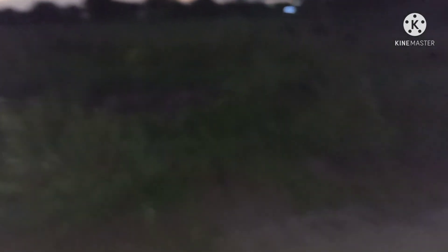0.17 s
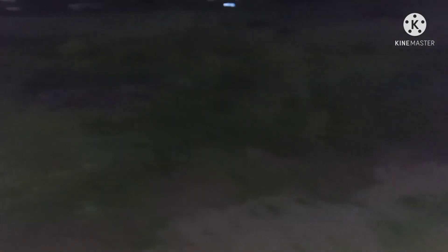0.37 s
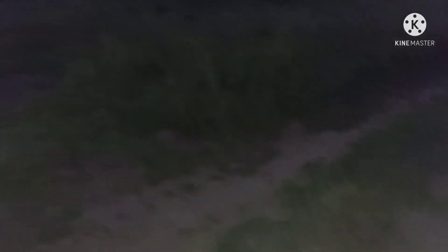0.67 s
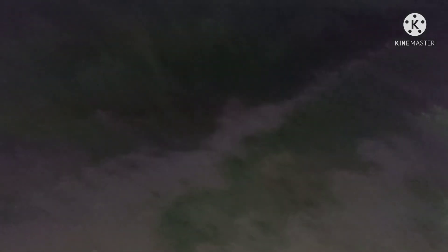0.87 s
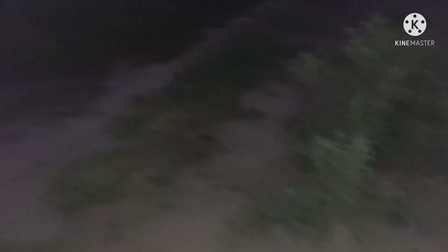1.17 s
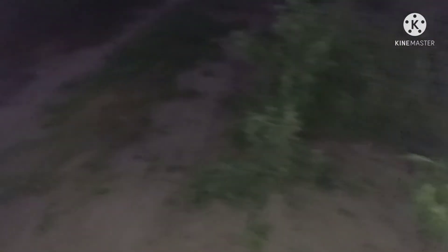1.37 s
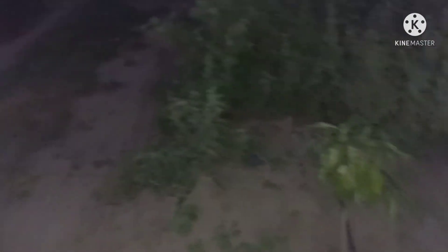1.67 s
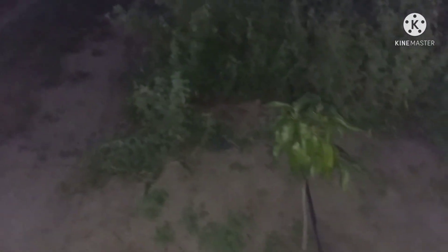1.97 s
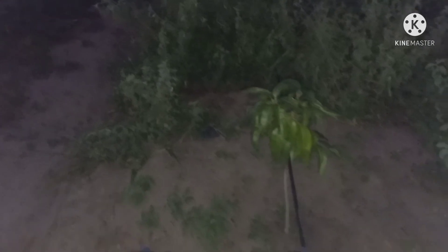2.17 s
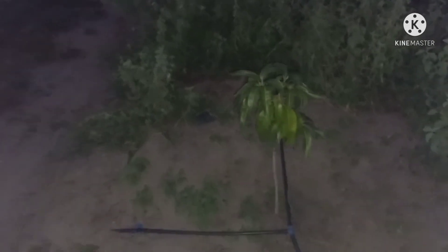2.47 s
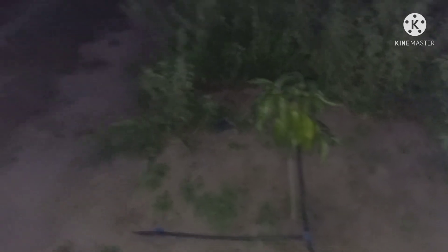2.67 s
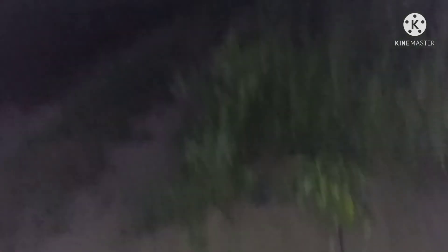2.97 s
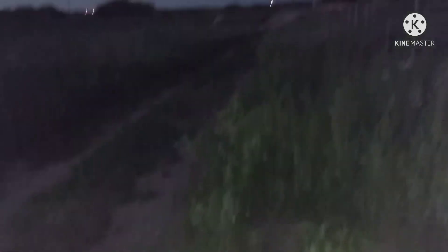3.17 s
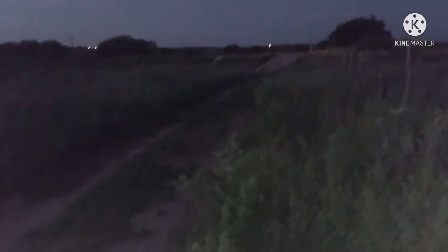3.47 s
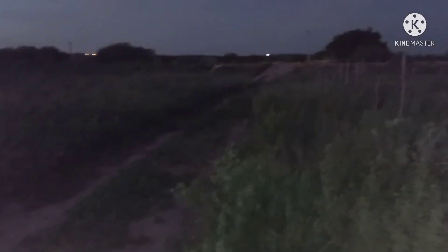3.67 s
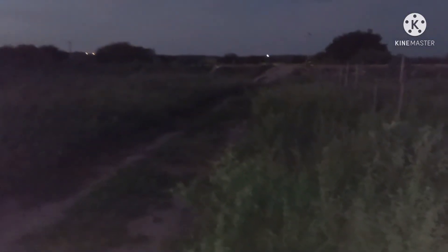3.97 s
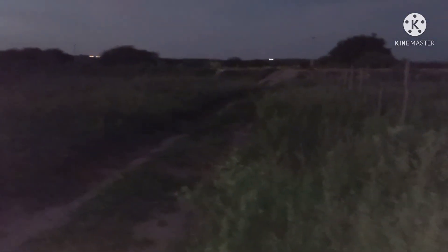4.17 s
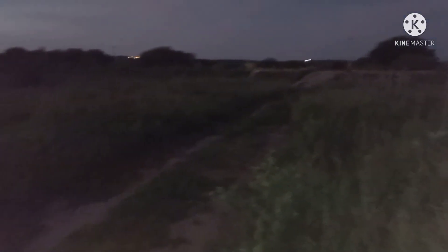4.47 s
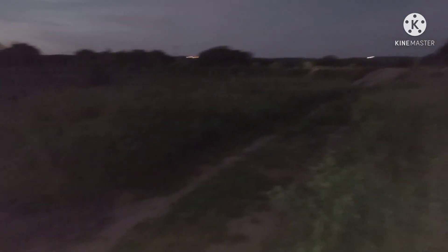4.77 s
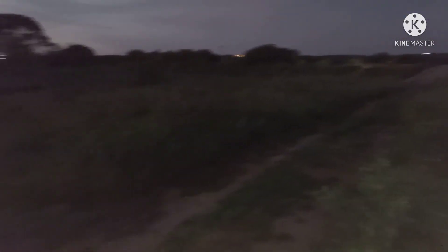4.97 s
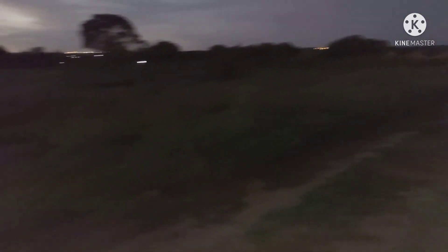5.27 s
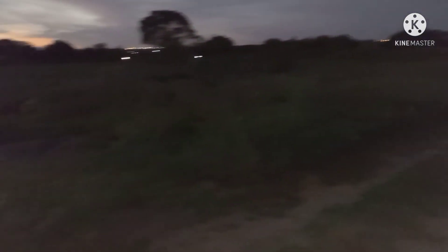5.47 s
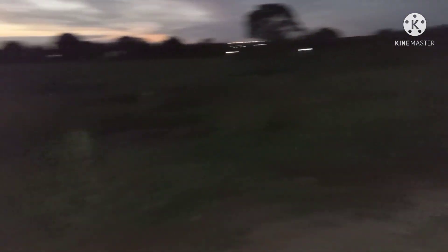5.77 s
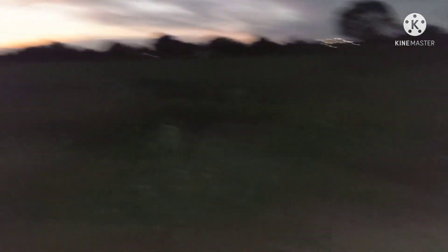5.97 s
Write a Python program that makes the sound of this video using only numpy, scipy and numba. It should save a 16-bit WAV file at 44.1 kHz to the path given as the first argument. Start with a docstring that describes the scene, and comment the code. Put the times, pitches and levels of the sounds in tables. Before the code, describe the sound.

Outdoor phone pickup of a continuous engine idle: a droning low throb, hollow exhaust tone and gritty panel rattle. A plant stem swishes past early and a dull soft knock follows. Insects tick and buzz thinly, a few weak rising chirps come later on the right, and the engine swells past the middle before falling back, over soft airy rumble.

```python
"""Idling engine in the fields

A small engine idles at a nearly steady speed in open fields at dusk, heard by a hand-held phone that turns.
Each firing is a pulse that rings exhaust and silencer; noise and pulses together rattle the casing panels.
One insect buzzes on summed tones and noise, another ticks in bursts of filtered clicks, and chirps rise.
Filtered noise makes leaves, a passing stem, a dull knock and the air; thin whistles are sliding sine tones."""
import sys
import numpy as np
from scipy import signal
from scipy.fft import rfft, irfft
from scipy.io import wavfile
from scipy.ndimage import uniform_filter1d
from numba import njit

SR = 44100
rng = np.random.default_rng(int(sys.argv[2]) if len(sys.argv) > 2 else 0)


def waveform_to_disk(signal):
    """Save audio, clipped to [-1, 1], as 16-bit WAV at the path in sys.argv[1]."""
    frames = np.transpose(np.atleast_2d(signal))
    scaled = np.clip(frames, -1, 1) * 32767
    samples = np.round(scaled).astype(np.int16)
    wavfile.write(sys.argv[1], SR, samples)


N = 269010

# Engine speed: t/s, firing rate f/Hz (a small wobble is added)
FIRING_RATE = [(0, 34.68), (1, 34.72), (1.5, 34.79), (2.4, 34.87), (3.2, 34.96), (4, 35.0), (4.75, 35.04),
               (4.82, 34.66), (6.1, 34.6)]
FIRST_TURN = .405  # part of a cycle already run at the start
# Where the engine stands: t/s, angle to the right of the phone's front/degrees
ENGINE_BEARING = [(0, 80), (.75, 62), (1.25, 38), (1.75, 21), (2.25, 15), (3.25, 12), (4.25, 0), (4.75, 6),
                  (5.25, 15), (6.1, 31)]
MIC_SPACING_M = .15

# Base levels of the exhaust: t/s, boom level/dB, silencer ring level/dB
BOOM_AND_SILENCER = [(0.0, -51, -72), (0.7, -54.5, -71), (0.75, -50, -69), (1.48, -48, -73),
                     (1.63, -49, -68), (2.11, -51.5, -73.5), (2.41, -50, -62), (2.87, -50, -71),
                     (3.09, -48.5, -59.5), (3.26, -51, -58), (3.87, -47, -52.5), (4.66, -45.5, -55),
                     (5.03, -49, -62.5), (5.16, -50, -57), (5.84, -54, -74), (6.1, -53.5, -69)]
# Base levels of the exhaust: t/s, deep thump level/dB, pipe level/dB
THUMP_AND_PIPE_LEVELS = [(0.0, -55, -63), (0.03, -55, -73), (1.1, -51.5, -62), (2.26, -53.5, -65.5),
                         (2.34, -51, -63), (4.47, -52.5, -66.5), (4.77, -55, -57.5), (5.32, -52.5, -66.5),
                         (6.08, -55.5, -74.5), (6.1, -47, -67)]
# Exhaust tone colour: multiple of the firing rate, relative level/dB
EXHAUST_TONE = [(1, -39), (2, -6.5), (3, -13.5), (4, 3.5), (5, 4.5), (6, -11), (7, -24.5), (8, -14.5),
                (9, -14.5), (10, -15), (11, -17), (12, -18), (13, -26), (14, -30), (15, -19), (16, -13),
                (17, -8.5), (18, -7), (19, -21), (20, -16.5), (21, -7.5), (22, -10), (23, -11), (24, -24),
                (25, -19), (26, -40), (28, -31), (29, -15.5), (30, -22.5), (31, -29.5), (32, -13),
                (33, -24.5), (34, -29.5), (35, -16.5), (36, -37.5)]
# Nine exhaust parts: from f/Hz, to f/Hz, suddenness/0-1, gas roughness/ratio, share of the pan/0-1
EXHAUST_PARTS = [(20, 122, .3, .08, .15), (122, 157, .25, .06, .15), (157, 226, .25, .06, .15),
                 (226, 331, .4, .3, .3), (331, 400, .5, .22, .45), (400, 500, .5, .22, .45),
                 (500, 680, .25, .33, .9), (680, 925, .25, .45, .9), (925, 1400, .6, .5, .9)]
# The same parts: level over the base level/dB, gain side-on/dB, gain in the swell/dB
EXHAUST_PART_LEVELS = [(2.5, -3.5, -3.5), (-2, -5.5, 5.5), (2.5, -3, 2.5), (1.5, -10.5, 6), (0, -0.5, -3),
                       (-11, 10, -3.5), (-3.5, 5.5, 1), (-5.5, 2, 3.5), (-6, -5.5, -8)]
# Each pitch of the exhaust pulse has its own delay; around 675 Hz comes last: f/Hz, delay/ms
EXHAUST_DELAY = [(40, 3), (85, -.5), (122, -5), (150, 0), (260, .8), (315, -3), (400, -5), (520, -6.5),
                 (620, -.4), (675, 4.5), (750, -2), (800, -3.5), (950, -1)]
PUFF_DB = 2  # size of each part's own level drift, scaled by its roughness
SWELL_S, SWELL_RISE_S, SWELL_FALL_S = 5.27, 0.52, 0.9  # exhaust parts shift in level around this time
BASS_PAN_DB = -1.44  # left minus right, for every exhaust part
AHEAD_PAN_DB, SIDE_ADDS_PAN_DB = 5.5, -7.5  # left minus right, scaled by each part's share of the pan

# Five panel groups, low to top: width of one filter pass with the engine ahead/Hz,
# share that throbs with the firing/0-1, left-right likeness/0-1, direct knock of the firing/ratio
PANEL_GROUPS = [(340, .3, .75, .22), (400, .25, .6, .3), (300, .15, .55, .22), (330, .25, .55, .25),
                (500, .5, .3, .16)]
# The same groups: left minus right ahead/dB, left minus right side-on/dB
PANEL_PANS = [(5.5, -8.5), (3.5, -10), (-13, -7.5), (-10, -9), (-6.5, -12.5)]
# Resonances of the casing: f/Hz, width/Hz, relative level/dB
PANEL_MODES = [(906, 210, 0), (1140, 260, -2.5), (1480, 226, 1), (1922, 390, -0.5), (2300, 620, -17),
               (2610, 105, -4.5), (3070, 1000, -7)]
# Low panels facing the phone: t/s, centre f/Hz, level/dB
LOW_PANEL_CURVE = [(0.0, 1300, -68), (0.27, 1290, -80), (0.64, 1410, -70.5), (1.19, 1180, -64),
                   (1.93, 1030, -68), (2.14, 940, -78.5), (2.39, 910, -63), (3.36, 940, -66.5),
                   (3.46, 1100, -60.5), (4.66, 1220, -64), (5.93, 1010, -69), (6.1, 1050, -68.5)]
# Middle panels: t/s, centre f/Hz, level/dB
MIDDLE_PANEL_CURVE = [(0.0, 1840, -76), (0.12, 2010, -73.5), (0.3, 1940, -68.5), (0.56, 1850, -66.5),
                      (0.81, 1680, -72), (1.03, 2040, -73), (1.4, 1470, -65), (2.0, 1490, -64.5),
                      (2.6, 1560, -61.5), (2.85, 1730, -76), (3.04, 1710, -63), (3.75, 1470, -66.5),
                      (4.18, 1740, -73.5), (4.79, 1450, -68.5), (5.06, 1570, -66), (5.54, 1390, -71.5),
                      (6.1, 1900, -76.5)]
# High panels: t/s, centre f/Hz, level/dB
HIGH_PANEL_CURVE = [(0.0, 2240, -81), (0.42, 2250, -78), (0.87, 2230, -75), (0.92, 2430, -75),
                    (1.72, 2450, -71.5), (1.852, 2550, -81), (2.24, 2650, -71.5), (2.53, 2460, -71),
                    (2.87, 2400, -83.5), (3.13, 2300, -64.5), (4.38, 2250, -82), (4.47, 2220, -70),
                    (4.76, 2390, -73.5), (5.25, 2300, -66.5), (5.42, 2280, -83.5), (5.8, 2480, -79),
                    (6.1, 2320, -85)]
# Upper panels: t/s, centre f/Hz, level/dB
UPPER_PANEL_CURVE = [(0, 3030, -75), (.19, 2850, -75.5), (.51, 3040, -84), (1.42, 3150, -82),
                     (1.88, 2930, -92), (2.56, 2860, -69.5), (2.72, 2920, -92), (3.14, 3160, -79),
                     (3.45, 2970, -71.5), (3.722, 2820, -71.5), (3.82, 2980, -68.5), (4.08, 2990, -67.5),
                     (4.15, 2920, -76), (4.52, 2990, -69), (4.81, 3060, -86), (5.25, 3270, -73),
                     (5.95, 3000, -93.5), (6.1, 3150, -84)]
# Top panels: t/s, centre f/Hz, level/dB
TOP_PANEL_CURVE = [(0, 5730, -124), (.6, 5660, -80), (.74, 5550, -100), (.8, 4400, -100), (.92, 4540, -75),
                   (1.2, 4240, -94), (1.6, 3970, -75), (1.898, 4020, -92), (2.1, 5450, -88),
                   (2.5, 5450, -79), (2.8, 5530, -81.5), (3.902, 5200, -76.5), (4.4, 5880, -79),
                   (6.1, 5750, -91)]
PAN_DRIFT_DB = 3
SIDE_WIDENS = 1.1  # panels blur together when heard side-on
CASING_LATE = 4  # samples: the casing rattle reaches the left channel this much later
ECHO_MS, ECHO_DRIFT_MS, ECHO_DB = 3.5, .4, -8  # the casing again, off a nearby surface

# Ticking insect, a row for each stroke of the wing file: t/s, length/s, loudest tooth level/dB, ring f/Hz
WING_FILE_STROKES = [(.1486, 0.013, -41.5, 14200), (0.42, 0.007, -50.5, 14300), (0.773, 0.027, -46, 14700),
                     (1.093, 0.01, -51, 15000), (1.7609, 0.016, -52, 14000), (1.817, 0.0061, -43, 13900),
                     (1.914, 0.008, -60, 14700), (2.14, 0.011, -51.5, 13300), (2.3785, 0.016, -58, 14800),
                     (2.578, 0.0062, -38.5, 14700), (2.6434, 0.0091, -50, 15000),
                     (2.716, 0.0037, -50, 13500), (2.967, .02, -44, 14600), (3.0275, 0.0061, -49, 14200),
                     (3.243, 0.04, -44.5, 14100), (3.286, 0.015, -40, 13600), (3.304, 0.01, -49, 13300),
                     (3.6142, 0.016, -57, 14400), (3.8851, 0.0067, -56, 14400),
                     (4.1739, 0.0069, -47, 15100), (4.189, 0.0075, -45, 14600),
                     (4.586, 0.024, -39.5, 14600), (4.998, 0, -44, 14200), (5.1931, 0.008, -54, 14500),
                     (5.417, 0.0033, -55, 15700), (5.485, 0.0028, -50, 15100), (5.7703, 0.004, -55, 14700),
                     (5.8007, 0.0072, -53, 15100), (5.9683, 0.0052, -46, 15100),
                     (6.0382, 0.0098, -46, 15200), (6.0811, 0.0016, -41, 15400)]
TOOTH_S = .01  # time from one tooth to the next
GROW_DB = 3.5  # each tooth louder than the one before
SCRAPE_DB, SCRAPE_S = -78.5, 0.041  # hiss of the wing that swells round each stroke

# Buzzing insect: t/s, base level/dB
BUZZ_LEVEL = [(0.0, -74), (0.03, -76.5), (1.1, -78), (1.26, -70), (2.7, -78.5), (3.41, -71), (5.33, -79),
              (6.1, -79)]
# Buzzing insect: t/s, wing stroke rate f/Hz
WING_RATE = [(0, 165.3), (.35, 165.9), (.65, 168.1), (1.3, 168), (1.55, 167.2), (2.1, 166.6), (2.5, 166.1),
             (2.85, 165.3), (3.3, 164.7), (5, 164.5), (5.5, 168), (6.1, 167.5)]

# Faint rising chirps on the right: t/s, half the peak before panning: level/dB
CHIRP_NOTES = [(2.385, -75), (3.81, -74), (4.01, -72), (4.34, -76), (4.435, -77), (4.68, -79), (5.025, -78),
               (5.215, -74), (5.575, -78)]
CHIRP_S, CHIRP_FROM_HZ, CHIRP_TO_HZ, CHIRP_PAN_DB = .024, 2780, 3100, -6
# Sliding whistles: t/s, length/s, from f/Hz, to f/Hz, base level/dB
WHISTLE_SLIDES = [(2.02, .16, 13050, 11550, -84), (2.18, .13, 11750, 9100, -85),
                  (2.3, .07, 9150, 9400, -85), (4.06, .09, 11600, 13000, -85),
                  (4.14, .08, 12950, 12400, -85), (4.29, .1, 13300, 11400, -91),
                  (4.38, .1, 11400, 11100, -88)]
FADE_S = .02  # whistle fade at each end

# Leaves brushing close: peak t/s, rise/s, fall/s, base level/dB, brightness/dB, fullness/dB
LEAF_RUSTLES = [(0.0, .1, 0.019, -76, 0, -11), (1.36, 0.18, 0.18, -68.5, 5.5, -3.5),
                (2.55, 0.38, 0.13, -75.5, -10, -7), (2.88, 0.32, 0.22, -81, 9, -23),
                (3.08, 0.049, 0.33, -71.5, -4, -2.5), (4.05, 0.18, 0.052, -67.5, -3, -4),
                (4.62, 0.47, 0.14, -77, -8, -1), (5.22, 0.33, 0.091, -72.5, -20, -1),
                (6.1, 0.53, .1, -79, -17, -5)]
STILL_DB, STILL_BRIGHT_DB, STILL_FULL_DB = -76.5, -1, -5.5  # leaves at rest
# A stem swishes past: t/s, centre f/Hz, base level/dB
STEM_SWISH = [(1.15, 8700, -95), (1.27, 11500, -73), (1.36, 11400, -69), (1.43, 13500, -61),
              (1.52, 14000, -77), (1.6, 13500, -100)]
SWISH_WIDTH_HZ = 6000  # of one filter pass
# Soft knocks near the phone: t/s, peak level/dB
SOFT_KNOCKS = [(1.665, -49)]
# Colour of the air: f/Hz, relative level for each Hz/dB
AIR_COLOUR = [(15, -68), (25, -12), (170, -13), (248, -23), (500, -33), (620, -33), (955, -47),
              (1430, -47.5), (3680, -59), (7420, -93), (15800, -60)]
AIR_DB = -59  # level when the boom's base level is -51.5 dB
TOP_HZ = 15560  # upper edge of the recorder's range


def engine():
    """Exhaust and casing share the same firings; sound from the right reaches the left microphone later."""
    turns = crank()
    bangs = unit(pulses(turns, 0.00013, 0.47))
    rattle = casing(turns, bangs)
    rattle = np.array([np.roll(rattle[0], CASING_LATE), rattle[1]])
    left, right = exhaust(turns, bangs) + rattle
    lag = side_on() * MIC_SPACING_M / 343 * SR  # 343 m/s is the speed of sound
    return np.array([np.interp(np.arange(N) - lag, np.arange(N), left), right])


def crank():
    """Firing cycles run so far; the governor makes the timing sway between five and six times a second."""
    hunt = unit(band(rng.standard_normal(N), 5.25, 6.12, order=1))
    return FIRST_TURN + np.cumsum(read(FIRING_RATE)[0]) / SR + .004 * hunt


def pulses(turns, jitter_s, scatter_db):
    """One pulse a cycle, shared between two samples, each a little off in time and size."""
    chance = rng.standard_normal((1200, 2))[:int(turns[-1])]
    at = np.interp(np.arange(1, len(chance) + 1), turns, np.arange(N))
    at = np.clip(at + jitter_s * SR * chance[:, 0], 0, N - 2)
    size = undb(scatter_db * chance[:, 1])
    out = np.zeros(N)
    np.add.at(out, at.astype(int), size * (1 - at % 1))
    np.add.at(out, at.astype(int) + 1, size * (at % 1))
    return out


def exhaust(turns, bangs):
    """Firings ring the pipe; its parts swell apart as the phone turns, and gas roughens each puff."""
    boom_db, silencer_db = read(BOOM_AND_SILENCER)
    thump_db, pipe_db = read(THUMP_AND_PIPE_LEVELS)
    low_panel_db = read(LOW_PANEL_CURVE)[1]
    base_levels = (thump_db, boom_db, boom_db, pipe_db, pipe_db, pipe_db,
                   silencer_db, silencer_db, low_panel_db)
    side = side_on()
    swell = hump(SWELL_S, SWELL_RISE_S, SWELL_FALL_S)

    multiple, tone_db = np.transpose([(.5, -40), *EXHAUST_TONE, (40, -40)])
    f = np.maximum(np.arange(N // 2 + 1) * SR / N, 1)
    tone_hz = multiple * np.mean(read(FIRING_RATE))
    log_gain = np.interp(np.log(f), np.log(tone_hz), tone_db) * np.log(10) / 20
    phase = ringing(log_gain)
    # adding up the delay over frequency turns it into a phase
    delay_s = np.interp(f, *np.transpose(EXHAUST_DELAY)) / 1000
    delay_phase = 2 * np.pi * np.cumsum(delay_s) * SR / N

    # hiss of gas, strongest at the start of each cycle
    gas = rfft(unit(np.exp(-(turns % 1) / .9) * rng.standard_normal(N)))
    bang_spectrum = rfft(bangs)
    out = 0
    for settings, gains, base_db in zip(EXHAUST_PARTS, EXHAUST_PART_LEVELS, base_levels):
        lo, hi, sudden, rough, spread = settings
        over_db, side_db, swell_db = gains
        # less sudden parts swell before they die
        colour = np.exp(log_gain + 1j * (sudden * phase - delay_phase)) * (f >= lo) * (f < hi)
        part = unit(irfft((bang_spectrum + rough * gas) * colour, N))
        part_db = base_db + over_db + side_db * side + swell_db * swell + PUFF_DB * rough * walk(30)
        # the bass bends round the phone, so it takes less of the pan
        part_pan_db = BASS_PAN_DB + spread * (AHEAD_PAN_DB + SIDE_ADDS_PAN_DB * side)
        out = out + pan(part * undb(part_db), part_pan_db)
    return out


def ringing(log_gain):
    """Phase of a colour that starts at once and dies away, from its folded cepstrum."""
    c = irfft(log_gain, N)
    c[1:N // 2] *= 2
    c[N // 2 + 1:] = 0
    return rfft(c).imag


def casing(turns, bangs):
    """Rattle partly throbbing with the firing rings the panels; turning favours one panel or another."""
    side = side_on()
    throb = unit(np.exp(-((turns + .06) % 1) / .6))
    f = np.arange(N // 2 + 1) * SR / N
    # the .15 keeps some sound between the resonances
    panels = .15 + sum(undb(db) / (1 + (2 * (f - hz) / width) ** 2) for hz, width, db in PANEL_MODES)
    curves = LOW_PANEL_CURVE, MIDDLE_PANEL_CURVE, HIGH_PANEL_CURVE, UPPER_PANEL_CURVE, TOP_PANEL_CURVE
    out = 0
    for curve, settings, pans in zip(curves, PANEL_GROUPS, PANEL_PANS):
        width, share, like, knock = settings
        ahead_db, side_db = pans
        hz, db = read(curve)
        pan_db = ahead_db + (side_db - ahead_db) * side + PAN_DRIFT_DB * walk(2.754)
        share = np.clip(share, 0, 1)
        shaking = pair(like) * (1 - share + share * throb) + knock * bangs
        rattle = irfft(rfft(shaking) * panels, N)
        group = unit(svf(rattle, hz, width * (1 + SIDE_WIDENS * side)))
        out = out + pan(group * undb(db + .7 * walk(12)), pan_db)

    echoes = []
    for channel in out:
        echo_at = np.arange(N) - (ECHO_MS + ECHO_DRIFT_MS * walk(1.5)) * SR / 1000
        echoes.append(np.interp(echo_at, np.arange(N), channel))
    return out + undb(ECHO_DB) * np.array(echoes)


def side_on():
    """How far the engine stands to the right: 0 straight ahead, 1 fully side-on."""
    return np.sin(np.radians(read(ENGINE_BEARING)[0]))


def ticks():
    """Each tooth of the wing file clicks and the grass around smears it; the wing hisses round each stroke."""
    near = sum(hump(s + length / 2, SCRAPE_S, SCRAPE_S) for s, length, *_ in WING_FILE_STROKES)
    scrape = unit(band(pair(0.14), 12600, 15000)) * np.sqrt(near)
    out = pan(scrape * undb(SCRAPE_DB + 1.6 * walk(23)), 2.7)

    t = np.arange(1800) / SR
    attack = np.sin(np.minimum(t / .001, 1) * np.pi / 2) ** 2
    shape = attack * (np.exp(-t / .0009) + .06 * np.exp(-t / .025))  # short click, faint smear
    noises = rng.standard_normal((len(WING_FILE_STROKES), 8, len(t)))
    for (s, length, db, hz), noise in zip(WING_FILE_STROKES, noises):
        teeth = round(length / TOOTH_S)
        stroke_pan_db = 2.6 + 7.0 * noise[0, 0]  # each stroke lands at its own chance place
        for k in range(teeth + 1):
            click = band(noise[k] * shape, hz - 1100, hz + 1100, order=3)
            size = undb(db - GROW_DB * (teeth - k)) / np.abs(click).max()
            i = int((s + k * TOOTH_S) * SR)
            out[:, i:i + len(t)] += pan(click * size, stroke_pan_db)[:, :N - i]
    return np.array([out[0], np.roll(out[1], 1)])  # the insect sits left: the right port hears it later


def buzz():
    """High multiples of the wing rate give an even buzz; a chorus further off is hiss at the same pitch."""
    turns = np.cumsum(read(WING_RATE)[0]) / SR
    strokes = 0
    for k, line_db in zip(range(42, 49), (-9, -2, -6, 0, -2, -8, -11)):
        line = undb(2.5 * walk(1.5) + line_db) * np.sin(2 * np.pi * k * turns)
        strokes = strokes + pan(line, 4 * walk(1.2))
    chorus = unit(band(pair(0.023), 7000, 8060, order=3))
    mixed = undb(-2.5) * unit(strokes) + undb(-2) * chorus
    return pan(mixed, 3 - 4 * side_on()) * undb(read(BUZZ_LEVEL)[0])


def chirps():
    """Short notes of a far frog or cricket: a sine that rises in pitch while it swells and fades."""
    out = np.zeros(N)
    t = np.arange(int(CHIRP_S * SR)) / SR
    # half the rise, because the pitch is the slope of the phase
    cycles = t * (CHIRP_FROM_HZ + (CHIRP_TO_HZ - CHIRP_FROM_HZ) * t / CHIRP_S / 2)
    note = np.sin(np.pi * t / CHIRP_S) * np.sin(2 * np.pi * cycles)
    for s, db in CHIRP_NOTES:
        i = int(s * SR)
        out[i:i + len(t)] += 2 * undb(db) * note
    return pan(out, CHIRP_PAN_DB)


def whistles():
    """Thin sine tones that slide smoothly from one pitch to another."""
    out, t = 0, np.arange(N) / SR
    for s, length, from_hz, to_hz, db in WHISTLE_SLIDES:
        slide = np.sin(np.clip((t - s) / length, 0, 1) * np.pi / 2) ** 2
        hz = from_hz + (to_hz - from_hz) * slide
        on = np.clip(np.minimum(t - s, s + length - t) / FADE_S, 0, 1)
        tone = np.sqrt(2) * np.sin(2 * np.pi * np.cumsum(hz) / SR)
        out = out + on * undb(db + 2.5 * walk(40)) * tone
    return out


def leaves():
    """A faint flickering rustle of noise; it swells, fuller or brighter, as stems brush close."""
    gains = undb([[STILL_DB + STILL_FULL_DB], [STILL_DB], [STILL_DB + STILL_BRIGHT_DB]]) * np.ones(N)
    for s, rise, fall, db, bright_db, full_db in LEAF_RUSTLES:
        rustle = undb([[db + full_db], [db], [db + bright_db]]) * hump(s, rise, fall)
        gains = np.hypot(gains, rustle)
    full_gain, low_gain, bright_gain = gains
    full = unit(band(pair(0.057), 2680, 4780)) * undb(3.5 + 1.5 * walk(27))
    low = unit(band(pair(0.022), 5230, 8050)) * undb(1.8 + 2.4 * walk(23.55))
    high = unit(band(pair(0.023), 6460, 15700)) * undb(1.0 * walk(22.08))
    top = unit(band(pair(0.19), 14000, 16500)) * undb(-7.5 + 0.37 * walk(30))
    body = pan(full_gain * full + low_gain * low, 0.11)
    sparkle = pan(bright_gain * (high + top), 1.9)
    return (body + sparkle) * undb(1.46 * walk(10))


def swish():
    """A stem passes: crackly hiss in a band that mostly climbs."""
    hz, db = read(STEM_SWISH)
    hiss = unit(svf(pair(0.24), hz, SWISH_WIDTH_HZ))
    return pan(hiss * undb(db + 3.8 * walk(90)), 3.1)


def knocks():
    """A dull bump of short, dying noise."""
    out, t = np.zeros(N), np.arange(2600) / SR
    for s, db in SOFT_KNOCKS:
        bump = band(rng.standard_normal(len(t)) * np.exp(-t / .012), 250, 520, order=3)
        i = int(s * SR)
        out[i:i + len(t)] += bump / np.abs(bump).max() * undb(db)
    return out


def air():
    """Noise as rumble and hiss that follows the engine's boom; its bass is more alike left and right."""
    f = np.maximum(np.arange(N // 2 + 1) * SR / N, 1)
    mid, side = rfft(rng.standard_normal((2, N)))
    colour_hz, colour_db = np.transpose(AIR_COLOUR)
    gain = undb(np.interp(np.log(f), np.log(colour_hz), colour_db))
    difference = np.clip(f / 880.0, .45, 1) * side * np.array([[1], [-1]])
    both = gain * (mid + difference)
    boom_db = read(BOOM_AND_SILENCER)[0]
    return unit(irfft(both, N)) * undb(AIR_DB + 0.43 * (boom_db + 51.5) + 0.65 * walk(2.58))


def undb(db):
    """Decibels to gain."""
    return 10 ** (np.asarray(db) / 20)


def unit(x):
    """Scale to an average (rms) level of 1."""
    return x / np.sqrt(np.mean(x ** 2))


def read(table):
    """Columns of a time table, joined by straight lines, one value a sample."""
    s, *columns = np.transpose(table)
    return [np.interp(np.arange(N) / SR, s, c, left=c[0], right=c[-1]) for c in columns]


def band(x, lo_hz, hi_hz, order=2):
    """Butterworth band-pass: keep only the sound between two pitches."""
    edges = [lo_hz, min(hi_hz, .49 * SR)]
    return signal.sosfilt(signal.butter(order, edges, "band", fs=SR, output="sos"), x)


def walk(rate):
    """Random drift: levels held 1 / rate seconds and smoothed twice; spread 1."""
    k = int(SR / rate)
    steps = np.repeat(rng.standard_normal(N // k + 1), k)
    w = uniform_filter1d(uniform_filter1d(steps, k), k)[:N]
    return unit(w - w.mean())


def hump(s, rise, fall):
    """A smooth rise to 1 at s and a smooth fall."""
    t = np.arange(N) / SR - s
    return np.exp(-(t / np.where(t < 0, rise, fall)) ** 2)


def pan(x, pan_db):
    """Two channels, left louder by pan_db."""
    return x * undb(np.array([pan_db, -pan_db]) / 2).reshape(2, -1)


def pair(like):
    """Left and right noise with the given likeness."""
    mid, side = rng.standard_normal((2, N))
    like = np.clip(like, 0, 1)
    return np.sqrt((1 + like) / 2) * mid + np.sqrt((1 - like) / 2) * side * np.array([[1], [-1]])


def svf(channels, hz, width):
    """Steep band-pass whose centre moves: the resonance twice on each channel."""
    g, k = np.tan(np.pi * hz / SR), width / hz
    return np.array([resonate(resonate(c, g, k), g, k) for c in channels])


@njit
def resonate(x, g, k):
    """State-variable band-pass, sample by sample: two stores pass the sound to and fro."""
    y, b, l = np.empty(len(x)), 0., 0.
    for i in range(len(x)):
        v = (b + g[i] * (x[i] - l)) / (1 + g[i] * (g[i] + k[i]))
        b, l, y[i] = 2 * v - b, l + 2 * g[i] * v, k[i] * v
    return y


def scene():
    """Engine, insects and plants over the open air."""
    creatures = ticks() + buzz() + chirps() + whistles()
    plants = leaves() + swish()
    return engine() + creatures + plants + knocks() + air()


def record(dry):
    """The phone's microphone drops the deepest bass and the recorder cuts the top."""
    thin = signal.sosfilt(signal.butter(2, 48, "high", fs=SR, output="sos"), dry)
    return signal.sosfilt(signal.ellip(10, .2, 70, TOP_HZ, fs=SR, output="sos"), thin)


dry = scene()
out = record(dry)
waveform_to_disk(out)
```